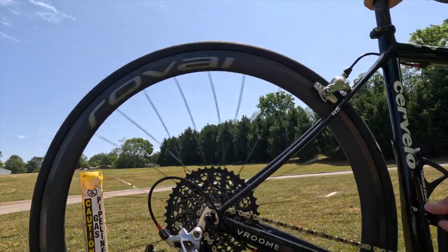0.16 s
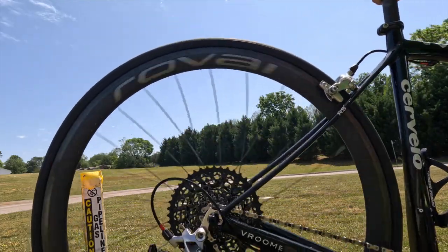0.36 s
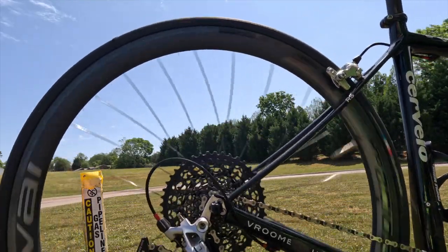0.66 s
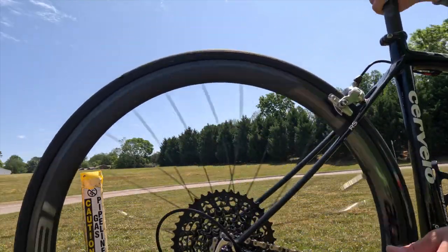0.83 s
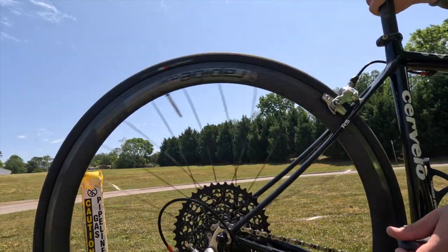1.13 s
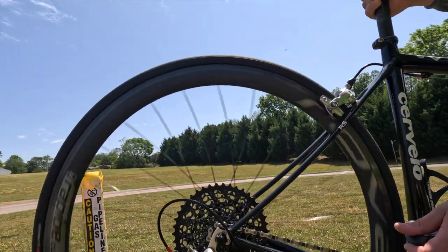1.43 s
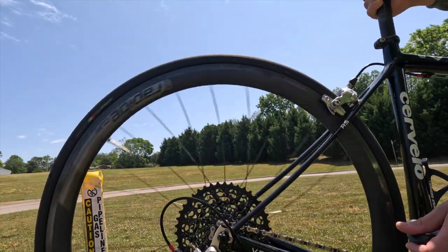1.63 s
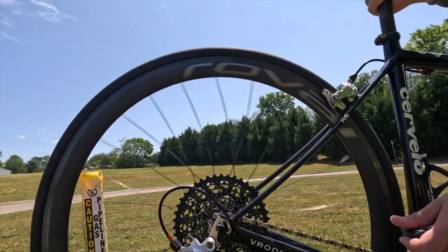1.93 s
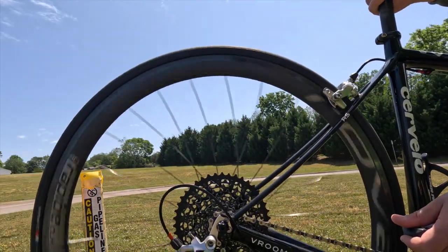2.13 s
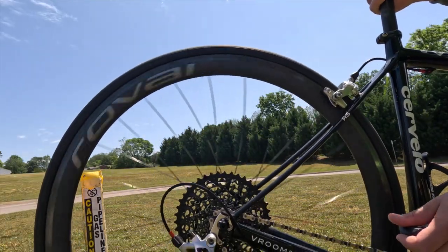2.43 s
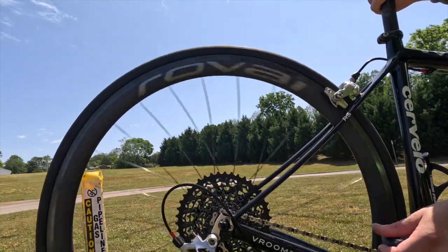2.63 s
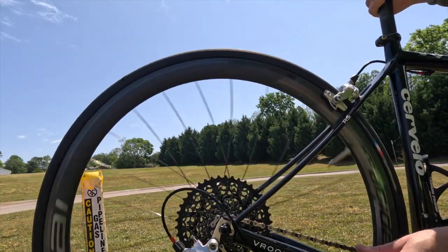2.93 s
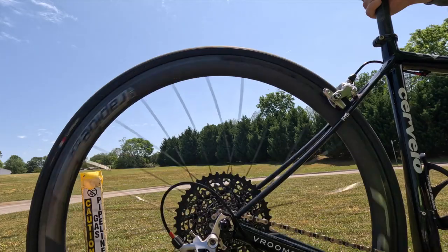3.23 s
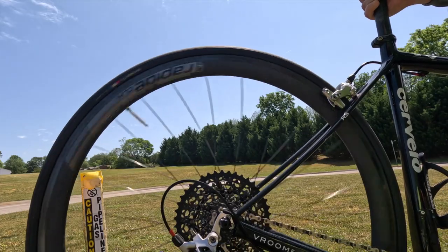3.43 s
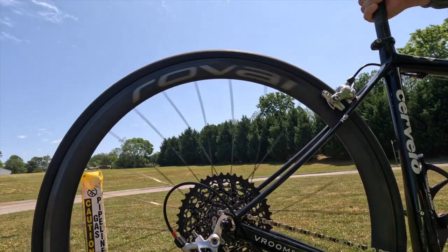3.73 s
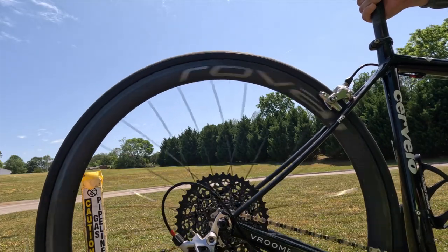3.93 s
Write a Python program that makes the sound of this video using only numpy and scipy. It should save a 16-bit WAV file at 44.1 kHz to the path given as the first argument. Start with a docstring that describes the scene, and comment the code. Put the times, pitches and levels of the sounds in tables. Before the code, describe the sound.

Loose metallic chain clatter for a second, then a loud rapid ratchet buzz from a spinning bike wheel, surging harder and softer, with faint wind rumble.

```python
"""Cranked and freewheeling bicycle wheel

A bicycle held off the ground in a field: pedals cranked by hand, chain links rattling over the sprockets.
Then the rear wheel spins free and its hub ratchet buzzes, slapping harder and softer twice a turn.
Blows timed by link and tooth drive resonant filters; shaped noise and short tone bursts make the wind
that rumbles and thumps on the microphone."""
import sys
import numpy as np
from scipy import signal
from scipy.fft import rfft, irfft
from scipy.io import wavfile
from scipy.ndimage import uniform_filter1d

SR = 44100
rng = np.random.default_rng(int(sys.argv[2]) if len(sys.argv) > 2 else 0)


def wav_out(sig):
    """Save sig, one row per channel (or a flat mono array), as 16-bit PCM at SR to the path in sys.argv[1]."""
    wavfile.write(sys.argv[1], SR, np.round(np.clip(np.atleast_2d(sig).T, -1, 1) * 32767).astype(np.int16))


N = 179302
TIME = np.arange(N) / SR
SIZE = 3 * 2 ** 16  # FFT length, samples
HZ = np.fft.rfftfreq(SIZE, 1 / SR)
TEETH_PER_TURN = 36
PEDAL_STOP_S = 0.9


def amp(db):
    """Decibels to gain."""
    return 10 ** (np.asarray(db) / 20)


def evened(x):
    """Scales to rms 1."""
    return x / np.sqrt(np.mean(x ** 2) + 1e-20)


def follow(rows, at):
    """Every column of a curve table, read at the given times."""
    s, *columns = np.transpose(rows)
    return [np.interp(at, s, c) for c in columns]


def read(rows):
    """Every column of a spectrum table, on a log-frequency axis."""
    hz, *columns = np.transpose(rows)
    return [np.interp(np.log(HZ + 1), np.log(hz + 1), c) for c in columns]


def colour(x, db):
    """Causal minimum-phase filter of unit energy with the given gain: resonances ring after the blow."""
    cepstrum = irfft(np.log(amp(db)))
    cepstrum[1:SIZE // 2] *= 2
    cepstrum[SIZE // 2 + 1:] = 0
    response = np.exp(rfft(cepstrum))
    unit_response = response / np.sqrt(np.mean(abs(response) ** 2))
    return irfft(rfft(x, SIZE) * unit_response)[:N]


def noise(db):
    """Steady noise of rms 1 with the given spectrum."""
    white = rng.standard_normal(SIZE)
    return evened(irfft(rfft(white) * amp(db))[:N])


def drift(hz):
    """Slow random wander of rms 1, with little much faster than the given rate."""
    return noise(-40 * np.log10(1 + (HZ / hz) ** 2))


def blows(times, db, chatter, decay_s, rise_s=0.00014):
    """Sharp blows; a share of each one's energy goes into a chatter of loose metal that swells and dies."""
    train = np.zeros(N)
    at = np.clip(np.round(times * SR).astype(int), 0, N - 1)
    np.add.at(train, at, amp(db))
    power = train ** 2 + 1e-20
    chatter = np.clip(chatter, 0, 1)
    for keep in np.exp(-1 / (np.array([decay_s, rise_s]) * SR)):
        power = signal.lfilter([1 - keep], [1, -keep], power)
    loose = np.sqrt(chatter * power) * rng.standard_normal(N)
    return np.sqrt(1 - chatter) * train + loose


def hub_peaks(detune=0):
    """Hub, sprocket and spoke resonances, dB above the broad response, shifted in pitch by the share detune."""
    # resonances: hz, width_hz, height_db
    resonances = [(1042, 34, 11), (1521, 56, 13), (1711, 33, 14), (2040, 71, 12), (2058, 110, 13.5),
                  (2400, 36, 12.5), (2566, 19, 20.5), (2732, 23, 16.5), (2770, 61, 13.5), (2774, 19, 15.5),
                  (2976, 17, 14.5), (3240, 61, 13), (3463, 29, 12), (3908, 23, 11), (4130, 100, 3.5),
                  (4417, 47, 11), (5560, 74, -2.5), (5742, 83, 9), (6237, 90, 8.5), (6640, 36, 4),
                  (6940, 66, 6.5), (7140, 130, 1.5), (8600, 87, 2)]
    power = 1
    for hz, width_hz, height_db in resonances:
        power = power + amp(height_db) ** 2 / (1 + (2 * (HZ - hz * (1 + detune)) / width_hz) ** 2)
    return 10 * np.log10(power)


def pedalling():
    """1 until the pedals stop, then fading to 0 over a short moment."""
    fade_s = 0.052
    return np.clip((PEDAL_STOP_S - TIME) / fade_s + 1, 0, 1)


def chain(peaks, link_db=-14.5, jockey_db=-18, ping_db=-22, snap_db=13, rub_db=-2,
          scatter_db=4.5, jitter_s=0.0013, slack_db=-6):
    """Links land on the sprocket and rub through the jockey wheels until the pedals stop."""
    # chain speed: time_s, links_per_s
    link_rate = [(0, 42), (.3, 47.5), (.55, 55), (.88, 61)]
    # links snapping onto a sprocket: start_s, level_db (before snap_db), strongest_hz
    snaps = [(0.019, -19.5, 4640), (0.033, -19.5, 6500), (0.0538, -23, 5400), (0.075, -25, 6050),
             (.119, -25, 7000), (0.161, -26, 4500), (0.2027, -20.5, 5460), (0.221, -20, 3350),
             (0.2467, -17.5, 5800), (0.262, -17, 5700), (0.282, -16.5, 4420), (0.32, -24, 4500),
             (0.343, -21.5, 4500), (0.377, -15.5, 4830), (.429, -33, 4500), (0.436, -21, 4150),
             (0.44, -23, 4500), (0.472, -19, 4470), (0.479, -36, 4400), (0.509, -27, 7000),
             (0.518, -20, 7000), (0.532, -21, 6000), (0.545, -19.5, 3500), (0.586, -22, 6050),
             (0.638, -18.5, 4460), (0.656, -19, 4000), (0.661, -30, 4000), (0.6903, -19, 7000),
             (0.698, -20.5, 7050), (0.707, -18, 6500), (0.739, -16.5, 5000), (0.757, -19, 4500),
             (0.7729, -18.5, 5840), (0.7914, -27, 4520), (0.809, -22, 5800), (.821, -28, 5000),
             (0.843, -27, 4500)]
    # pitch zones in which landings differ: centre_hz
    zones_hz = [1500, 3200, 5500, 7500, 10000]
    # broad colour of the rattle: hz, gain_db
    rattle_colour = [(200, -34), (900, 3.5), (1400, -1.5), (2000, -3.5), (2700, -1), (3300, 3.5), (4500, 4),
                     (5800, 3), (8000, 2), (9300, 0.5), (10700, -7.5), (12300, -9), (15000, -37)]
    # colour of the rubbing: hz, gain_db
    rub_colour = [(80, -1), (150, 10), (250, -5.5), (400, -1.5), (560, -6), (800, -3.5), (1300, -3.5),
                  (2000, -1), (3500, -5), (9000, -16)]
    # rubbing in the jockey wheels: time_s, level_db (before rub_db)
    rub_level = [(0, -39), (.12, -43.5), (.42, -40), (.68, -36), (.88, -39.5)]
    roller_hz, roller_width_hz = 9570, 800
    slack_s = 0.076  # links soften over this time before the stop
    focus_db_per_octave = 5  # fall away from a snap's strongest pitch

    links = np.cumsum(follow(link_rate, TIME)[0]) / SR
    lands = np.diff(np.floor(links)) > 0
    landings = TIME[1:][lands & (TIME[1:] < PEDAL_STOP_S)]
    times = np.concatenate([landings, landings + 0.013])  # each link also clicks on the jockey wheel
    level_db = np.repeat([link_db, jockey_db], len(landings))
    level_db = level_db + slack_db * np.clip((times - PEDAL_STOP_S) / slack_s + 1, 0, 1)
    snap_s, snap_level_db, snap_hz = np.transpose(snaps)

    rattle = np.zeros(len(HZ), complex)
    for zone_hz, zone in zip(zones_hz, np.eye(len(zones_hz))):
        late, luck = rng.standard_normal((len(times), 2)).T
        drive = blows(times + jitter_s * late, level_db + scatter_db * luck, chatter=0.84, decay_s=0.0044)
        off_pitch_db = focus_db_per_octave * abs(np.log2(zone_hz / snap_hz))
        drive = drive + blows(snap_s, snap_level_db + snap_db - off_pitch_db, chatter=0.88, decay_s=0.0026)
        rattle += rfft(drive, SIZE) * np.sqrt(np.interp(HZ, zones_hz, zone))
    rattle = colour(irfft(rattle)[:N], read(rattle_colour)[0] + 0.74 * peaks)

    pings = blows(landings + 0.0047, ping_db, chatter=0.071, decay_s=0.00049)  # each roller pings as it seats
    roller_db = -40 * np.log10(1 + ((HZ - roller_hz) / roller_width_hz) ** 2).clip(0, 2)
    pings = colour(pings, roller_db)
    rubbing = noise(read(rub_colour)[0]) * amp(follow(rub_level, TIME)[0] + rub_db) * pedalling()
    return rattle + pings + rubbing


def wind(field_db=-57):
    """A breeze and its gusts rumble on the microphone, with a few short thumps, over the hush of the field."""
    # gusts: centre_s, rumble_db, half_length_s
    gusts = [(.005, -32, 0.038), (0.294, -33.5, 0.081), (1.158, -40, 0.023), (1.51, -38, 0.011),
             (1.848, -39, 0.053), (2.263, -39, 0.04), (3.15, -48, .06), (3.773, -39, 0.052)]
    # colour of the rumble: hz, gain_db
    rumble_colour = [(8.8, -45), (15, 1.5), (43, -2), (59, 0.5), (76, -7.5), (108, -6), (237, -21.5),
                     (261, -23.5), (400, -35), (520, -71), (880, -120)]
    # low thumps: centre_s, level_db, pitch_hz, half_length_s
    thumps = [(.0065, -25, 64, 0.017), (0.269, -13.5, 81.5, 0.0056), (1.86, -32, 78.5, 0.045),
              (3.759, -28, 55.4, 0.029)]
    # distant outdoor hush: hz, gain_db
    field_colour = [(30, -26), (200, 10), (400, -10), (900, 18), (2000, -31), (6000, 14.5), (15000, -34)]
    breeze_db, sway_db, sway_hz = -41, 1.24, 0.82

    power = amp(breeze_db + sway_db * drift(sway_hz)) ** 2
    for s, db, length_s in gusts:
        power = power + amp(db) ** 2 * np.exp(-((TIME - s) / length_s) ** 2)
    rumble_db = read(rumble_colour)[0] - 40 * np.log10(1 + (HZ / 600) ** 4)
    air = noise(rumble_db) * np.sqrt(power)
    for s, db, hz, length_s in thumps:
        envelope = np.exp(-((TIME - s) / length_s) ** 2)
        air = air - amp(db) * np.sin(2 * np.pi * hz * (TIME - s)) * envelope
    return air + amp(field_db) * noise(read(field_colour)[0])


def teeth():
    """Number and time of every tooth that passes, and how fast the wheel runs then (0 slow, 1 fast)."""
    # free wheel angle: time_s, teeth_passed
    angle = [(0.9132, -1), (1.01002, 9), (1.08693, 17), (1.17648, 26), (1.26729, 35), (1.35932, 44),
             (1.44869, 53), (1.53418, 62), (1.62065, 71), (1.70733, 80), (1.79275, 89), (1.87843, 98),
             (1.96414, 107), (2.05104, 116), (2.13918, 125), (2.22803, 134), (2.31654, 143), (2.40563, 152),
             (2.4943, 161), (2.57651, 170), (2.65837, 179), (2.73723, 188), (2.81749, 197), (2.89977, 206),
             (2.98467, 215), (3.06697, 224), (3.14418, 233), (3.21964, 242), (3.29107, 251), (3.36195, 260),
             (3.43227, 269), (3.50781, 278), (3.5829, 287), (3.6586, 296), (3.73047, 305), (3.80199, 314),
             (3.87444, 323), (3.95008, 332), (4.02572, 341), (4.10628, 350)]
    slow_teeth_per_s, fast_teeth_per_s = 101.3, 118
    # first teeth pass slowly while the sprockets come to rest: lead of the first, spread over the next
    catch_s, catch_teeth = .0225, 1.8

    s, passed = np.transpose(angle)
    count = np.arange(int(passed[0]), int(passed[-1]))
    steps_s = np.diff(np.interp(count, passed, s))
    steps_s = uniform_filter1d(steps_s, size=TEETH_PER_TURN // 4, mode="nearest")  # the speed glides
    times = s[0] + np.append(0, np.cumsum(steps_s))
    times = times - catch_s * np.exp((count[0] - count) / catch_teeth)
    rate = 1 / np.gradient(times)
    fast = np.clip((rate - slow_teeth_per_s) / (fast_teeth_per_s - slow_teeth_per_s), 0, 1)
    heard = times < TIME[-1]
    return count[heard], times[heard], fast[heard]


def wheel_hum():
    """Low wheel resonances sing when a multiple of the tooth rate comes near; the chain stirs them too."""
    # low resonances: hz, width_hz, chain_drive_db
    modes = [(496.1, 4.9, -30), (1018, 11.2, -25)]
    # ratchet drive: time_s, lower_mode_db, upper_mode_db
    drive_level = [(.9, -3, 2), (1.2, -11.5, 0), (1.38, 1, -5), (1.65, 2.5, -26), (1.9, -21, 4),
                   (2.15, -7, 3), (2.45, -13, -7.5), (2.77, -8, 4), (3.1, -20, 8), (3.25, -8, -8),
                   (3.42, 1.5, 10), (3.62, -2.5, -1), (4.06, -1.5, 4)]
    knock_scatter_db, waver_db = 2.5, 1.5

    count, times, _ = teeth()
    knock_db = knock_scatter_db * rng.standard_normal(len(count))
    knocks = blows(times, knock_db, chatter=0.19, decay_s=0.0034)
    stir = rng.standard_normal(N) * pedalling()
    hum = np.zeros(N)
    for (hz, width_hz, chain_db), level_db in zip(modes, follow(drive_level, TIME)):
        drive = amp(level_db) * knocks + amp(chain_db) * stir
        hum += signal.lfilter(*signal.iirpeak(hz, hz / width_hz, fs=SR), drive)
    return hum * amp(waver_db * drift(hz=24))


def seating(count, fast, edge=5):
    """How much harder or softer (dB, before weighting) each tooth ticks, by the arc it lies in."""
    # arcs that seat badly or well, met twice a turn: centre_tooth, half_width_teeth, slow_db, fast_db
    arcs = [(0, 1.9, 1.3, -1.5), (3, 1.05, 0, -1.5), (4.6, 0.44, -6.7, 0.5), (6.6, 4.1, 1.1, 0),
            (7, 1.3, -5, -2), (9.7, 3.4, 0, 1)]
    half_turn, seat_db = TEETH_PER_TURN / 2, 0
    for centre, width, slow_db, fast_db in arcs:
        away = (count - centre + half_turn / 2) % half_turn - half_turn / 2
        seat_db = seat_db + np.exp(-abs(away / width) ** edge) * (slow_db + fast * (fast_db - slow_db))
    return seat_db


def surges(times):
    """Extra ring (dB): now and then the ratchet rings brighter or duller for a few teeth."""
    # surges: centre_s, half_length_s, ring_db
    surge_rows = [(1.98, 0.023, 1.5), (2.57, 0.016, 4), (2.665, 0.039, -2), (2.813, 0.028, -21),
                  (2.88, 0.041, 8), (2.984, 0.017, -10), (3.056, 0.022, 8.5), (3.26, 0.024, 2),
                  (3.762, 0.029, 6), (3.811, 0.024, 5), (4.013, 0.08, 5.5)]
    s, length_s, ring_db = np.transpose(surge_rows)
    return np.exp(-((times[:, None] - s) / length_s) ** 2) @ ring_db


def swells(times):
    """How hard (dB) the ring slaps home at these times: each swell rises, holds with a tilt and falls."""
    # full slaps, twice a turn and more broken at speed: centre_s, half_length_s, slap_db, climb_db
    swell_rows = [(0.927, 0.03, -0.8, -4.3), (1.058, 0.051, -2.5, 15.5), (1.248, 0.049, -1.0, 5.5),
                  (1.435, 0.043, -0.5, -1), (1.605, 0.044, -1.1, -0.6), (1.776, 0.042, -0.0, 4),
                  (1.951, 0.041, -0.5, 0.1), (2.124, 0.047, 0.7, 1), (2.302, 0.047, 0.1, -0.5),
                  (2.478, 0.045, -0.4, 2.5), (2.616, 0.016, -8, 1), (2.649, 0.039, 0.5, 10),
                  (2.81, 0.045, -4.5, 10), (2.841, 0.025, 1, -4), (2.935, 0.026, -6, 0),
                  (3.012, 0.028, 0, 0), (3.104, 0.023, -1, 4), (3.163, 0.022, -3, 0), (3.279, 0.041, 0, 5),
                  (3.307, 0.0066, 0, -0.3), (3.406, 0.048, -6.5, 8), (3.466, 0.014, -0.5, -3),
                  (3.567, 0.042, 0, 1), (3.706, 0.02, -3.5, -0.6), (3.762, 0.029, 1.5, -11),
                  (3.865, 0.05, -4, 1), (4.01, 0.042, 2, 5)]
    s, length_s, db, climb_db = np.transpose(swell_rows)
    place = (times[:, None] - s) / length_s
    tilted_db = db + climb_db * np.clip(place, -1, 1) / 2
    power = amp(tilted_db) ** 2 / (1 + place ** 10)
    return 10 * np.log10(power.sum(1) + 1e-20)


def skitters(times, db, decay_s, rise_s, size=900):
    """The ring skitters after each tooth, much as after its neighbour and as half a turn before."""
    like_neighbour, like_half_turn = .5, .65  # 0-1
    pattern = rng.standard_normal((len(times), size))
    t = np.arange(size) / SR
    for lag, alike in ((1, like_neighbour), (TEETH_PER_TURN // 2, like_half_turn)):
        for k in range(lag, len(times)):
            pattern[k] = alike * pattern[k - lag] + np.sqrt(1 - alike ** 2) * pattern[k]
    pattern *= np.sqrt((1 - np.exp(-t / rise_s)) * np.exp(-t / decay_s))
    pattern *= (amp(db) / np.linalg.norm(pattern, axis=1))[:, None]
    at = np.round(times * SR).astype(int)[:, None] + np.arange(size)
    return np.bincount(at.ravel(), pattern.ravel(), N)[:N]


def ratchet(peaks, tick_scatter_db=1.27, lead_s=.0006):
    """The sprung ring ticks off each tooth, slaps home and rebounds; speed makes it brighter and less even."""
    # broad colours of the four parts of a click: hz, gain_db
    slap_colour = [(200, -34), (1300, -23), (1840, -18), (2070, 8.5), (2300, 3), (2800, 6), (3060, -6.5),
                   (3600, -16), (4600, -13), (5800, -7), (8000, -18), (12000, -34), (16000, -35)]
    tick_colour = [(100, -19), (550, -20.5), (900, -12), (1820, -13), (2100, -8.5), (2750, -7), (3050, -2),
                   (3350, -6), (3700, -0.5), (4900, 1), (7100, 1), (7800, 1.5), (8200, -3.5), (8600, -2.5),
                   (9000, -3), (11100, -12), (12100, -9), (14500, -22.5)]
    ring_colour = [(200, -29), (4000, -29.5), (5000, -3), (5750, 4.5), (6500, -2.5), (7300, -5),
                   (10000, -32), (16000, -44)]
    clack_colour = [(200, -43), (3300, -15), (5200, 6.5), (7000, 4), (9000, -9.5), (11000, -11),
                    (12200, -7), (15000, -21)]
    # speed moves the slap's weight down in pitch: hz, slow_db, fast_db
    slap_shift = [(2120, 4, 4), (2630, 4, 0)]
    # hard landing of the ring and its rebound: delay_s, level_db (against the tick)
    clack_rows = [(.0005, -9), (.0014, -15)]
    # bright ring of the hub: time_s, level_db
    ring_level = [(.89, -32), (1.02, -12), (1.6, -8), (2.05, -6.5), (2.9, -5), (3.48, -1), (4.06, -10)]
    # long-ringing modes, perhaps of the sprockets, driven by the ticks: hz, width_hz, level_db (slow)
    singing_modes = [(3277, 14, 12.5), (3338, 18, 8.5)]
    slap_slow_db, tick_slow_db = -1.13, -3
    # changes at full speed
    slap_fast_db, tick_fast_db, clack_fast_db, singing_fast_db = -1.9, 1.15, -3, 3
    ring_scatter_db, clack_scatter_db, slow_jitter_s = 1.6, 1.8, .00001
    first_tooth_db = -6  # only brushed
    settle_db, settle_teeth = -1, 17  # soft ticks until the ring has settled
    lag_s, lag_tooth = .00013, 16  # slaps land latest around this tooth of each half turn
    slap_ringing = .55  # share of the hub's resonance heights
    sway_detune, sway_tooth = .007, 16  # resonances sway once a turn, rising through centre at this tooth

    count, times, fast = teeth()
    seat_db, surge_db = seating(count, fast), surges(times)
    late, tick_luck, ring_luck, clack_luck = rng.standard_normal((len(count), 4)).T
    times = times + slow_jitter_s * late * (1 + 4 * fast ** 2)  # lands less evenly at speed

    brushed_db = first_tooth_db * (count == count[0]) + settle_db * np.exp((count[0] - count) / settle_teeth)
    slap_db = slap_slow_db + slap_fast_db * fast + swells(times)
    tick_db = tick_slow_db + tick_fast_db * fast + brushed_db + 0.56 * seat_db + tick_scatter_db * tick_luck
    ring_db = follow(ring_level, times)[0] + brushed_db + surge_db
    ring_db = ring_db + 2.04 * seat_db + ring_scatter_db * ring_luck
    clack_db = tick_db + clack_fast_db * fast + clack_scatter_db * clack_luck

    lag = lag_s * np.cos(4 * np.pi * (count - lag_tooth) / TEETH_PER_TURN)
    slaps = blows(times + lag, slap_db, chatter=.02, decay_s=.005)
    clacks = sum(blows(times + s, clack_db + db, chatter=.3, decay_s=0.0014) for s, db in clack_rows)
    ticks = skitters(times - lead_s, tick_db, decay_s=0.005, rise_s=0.00016)
    rings = skitters(times - lead_s, ring_db, decay_s=0.002, rise_s=0.0013)

    speed = np.interp(TIME, times, fast)
    shift_slow_db, shift_fast_db = read(slap_shift)
    body_db = read(slap_colour)[0] + slap_ringing * peaks
    sound = colour(slaps * (1 - speed), body_db + shift_slow_db)
    sound += colour(slaps * speed, body_db + shift_fast_db)
    sound += colour(clacks, read(clack_colour)[0])

    turned = np.interp(TIME, times, count) - sway_tooth
    sway = np.sin(2 * np.pi * turned / TEETH_PER_TURN)
    for side in (-1, 1):  # crossfade between flat and sharp resonances
        share = (1 + side * sway) / 2
        leaning_db = hub_peaks(side * sway_detune)
        sound += colour(ticks * share, read(tick_colour)[0] + leaning_db)
        sound += colour(rings * share, read(ring_colour)[0] + leaning_db)

    singing = np.zeros(N)
    for hz, width_hz, db in singing_modes:
        singing += signal.lfilter(*signal.iirpeak(hz, hz / width_hz, fs=SR), amp(db) * ticks)
    return sound + singing * amp(singing_fast_db * speed)


def glints():
    """A few teeth catch with a bright, glassy ping."""
    # pings: start_s, level_db
    glint_rows = [(1.2465, -5), (1.4285, -3), (1.5995, -3), (1.609, -9)]
    pitch_hz, width_hz = 6950, 230
    s, db = np.transpose(glint_rows)
    off_pitch = (((HZ - pitch_hz) / width_hz) ** 2).clip(0, 300)
    return colour(blows(s, db, chatter=0.1, decay_s=0.0015), -20 * np.log10(1 + off_pitch))


def ports(direct, stray):
    """Both microphone ports share direct sound; stray sound from other sides of the wheel sets them apart."""
    # port pair: hz, left_lead_rad, left_minus_right_db, likeness (0-1)
    port_rows = [(50, 0, -2.8, .8), (250, 0, -.7, .87), (1200, -.3, 0, .9), (2000, -.33, .2, .96),
                 (2700, -.5, 1.1, .93), (3400, -1, .3, .85), (3900, -1.4, -3.5, .8), (4400, -.6, -2.5, .87),
                 (5300, -.05, -1.7, .98), (6600, 0, 0, .995), (9200, 0, .4, .96), (10200, -.2, 2, .75),
                 (12400, -.1, 4, .3), (13600, -3, 2, .3)]
    lead_rad, balance_db, alike = read(port_rows)
    alike = np.clip(alike, 0, 1)
    shared = rfft(direct, SIZE) * np.sqrt((1 + alike) / 2)
    # turned a quarter cycle, so blows common to both draws keep their balance
    apart = -1j * rfft(stray, SIZE) * np.sqrt((1 - alike) / 2)
    tilt = amp(balance_db / 2) * np.exp(.5j * lead_rad)
    return irfft(np.array([(shared + apart) * tilt, (shared - apart) / tilt]))[:, :N]


def scene():
    """Chain, then ratchet, over the wheel's hum and the wind; drawn twice, for direct and stray sound."""
    peaks = hub_peaks()
    direct, stray = (chain(peaks) + wind() + wheel_hum() + ratchet(peaks) + glints() for _ in range(2))
    return ports(direct, stray)


def record(dry):
    """Band limit: a linear-phase low-pass."""
    edge_hz = 15000
    lowpass = signal.firwin(511, edge_hz, window=("kaiser", 9), fs=SR)
    return signal.oaconvolve(dry, lowpass[None], "same")


dry = scene()
out = record(dry)
wav_out(out)
```